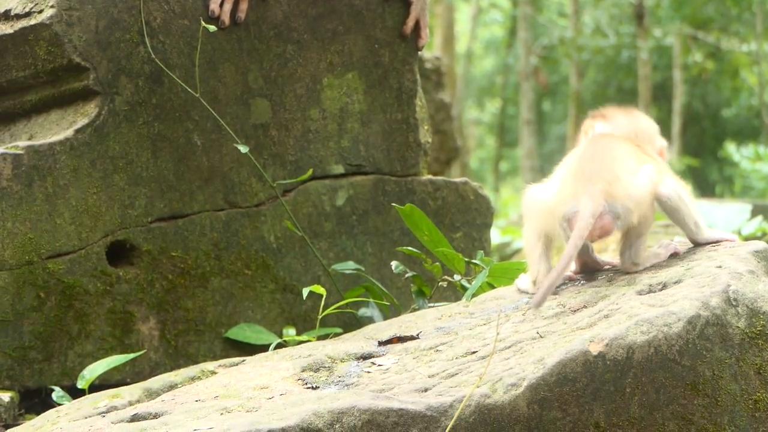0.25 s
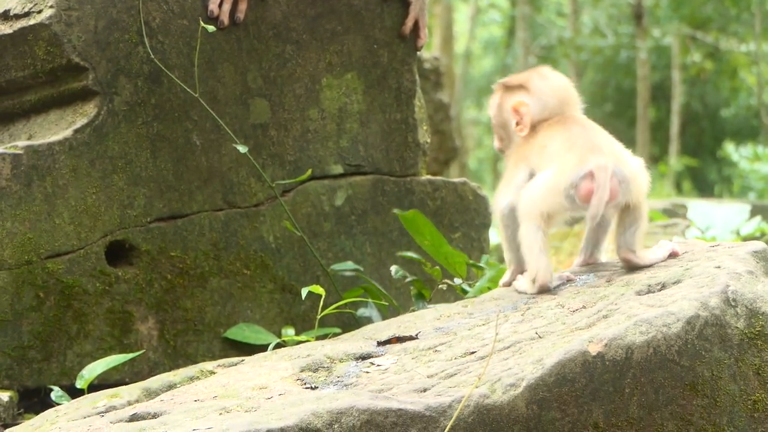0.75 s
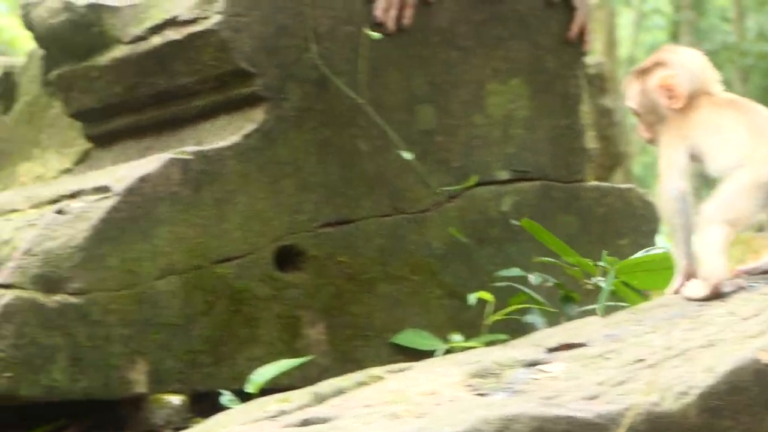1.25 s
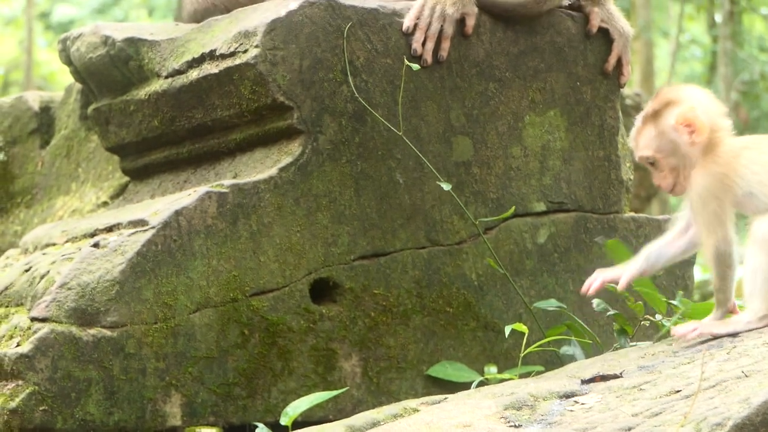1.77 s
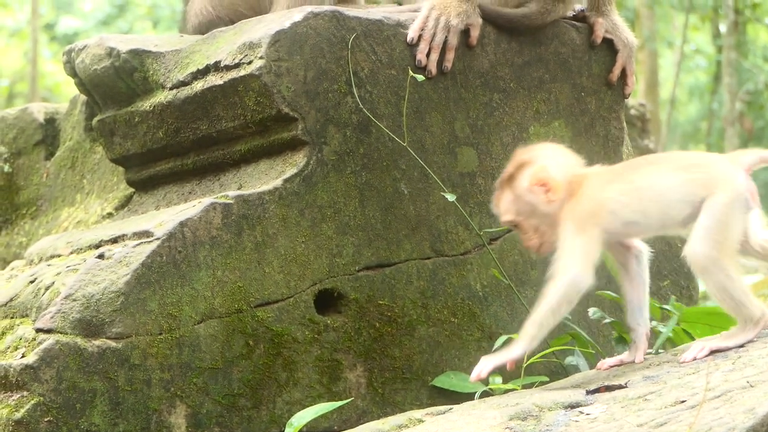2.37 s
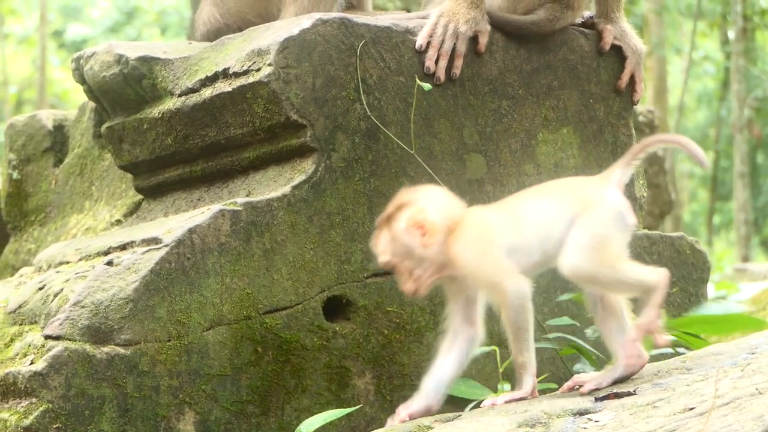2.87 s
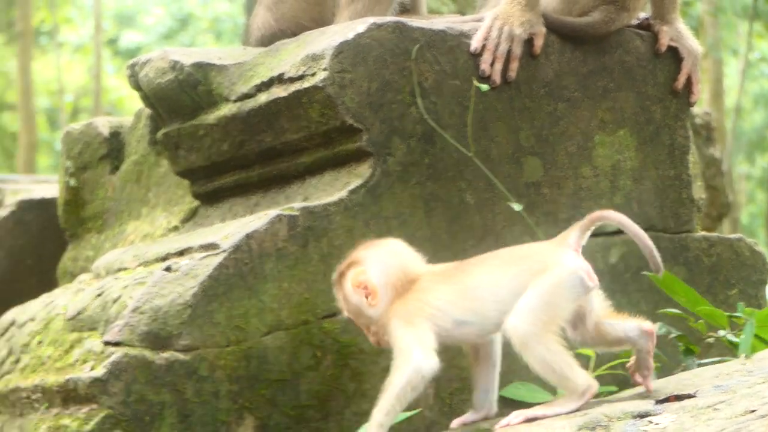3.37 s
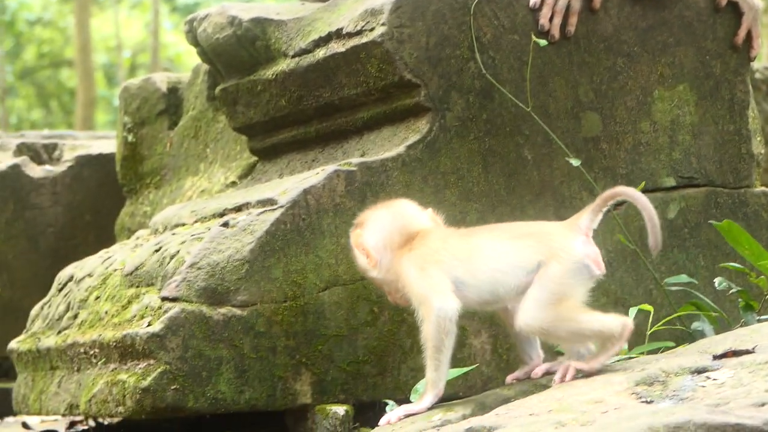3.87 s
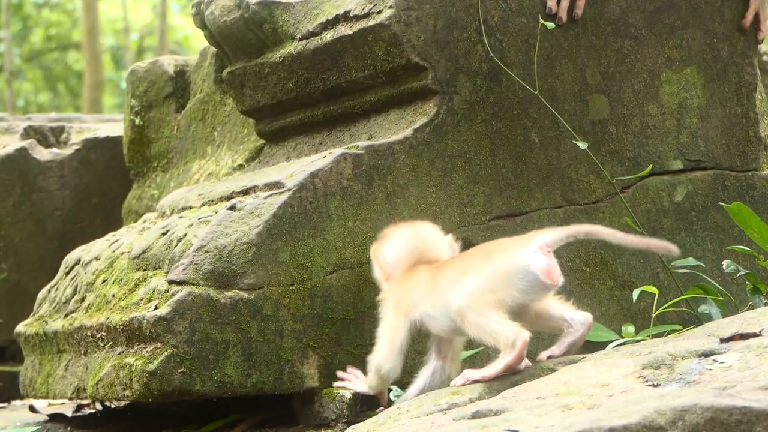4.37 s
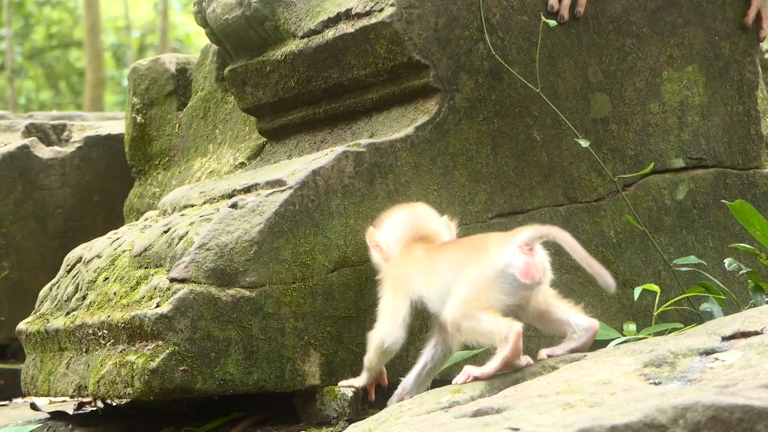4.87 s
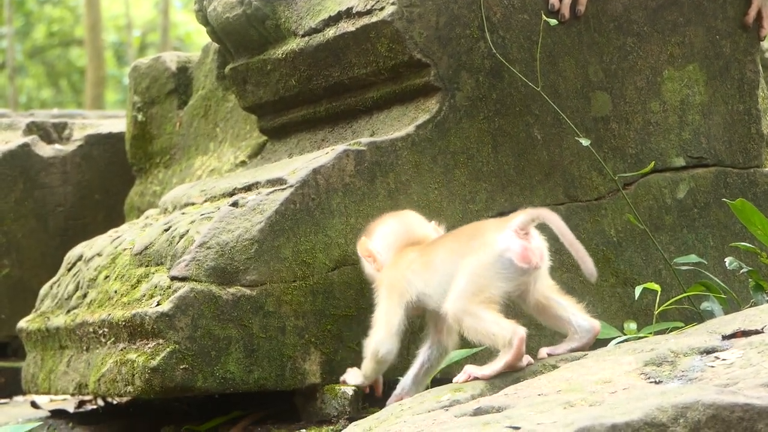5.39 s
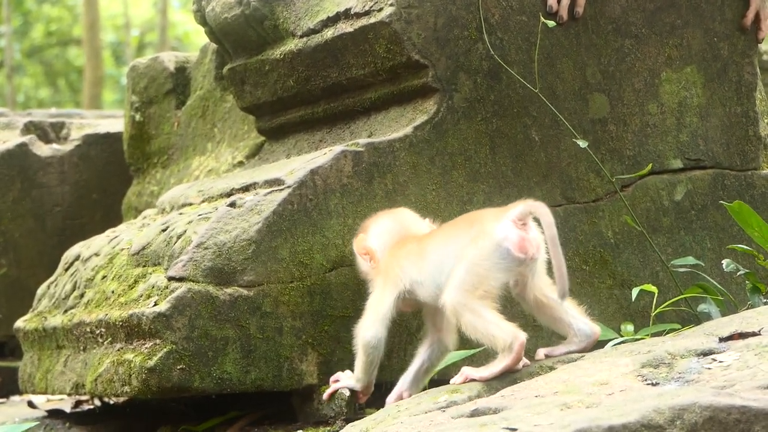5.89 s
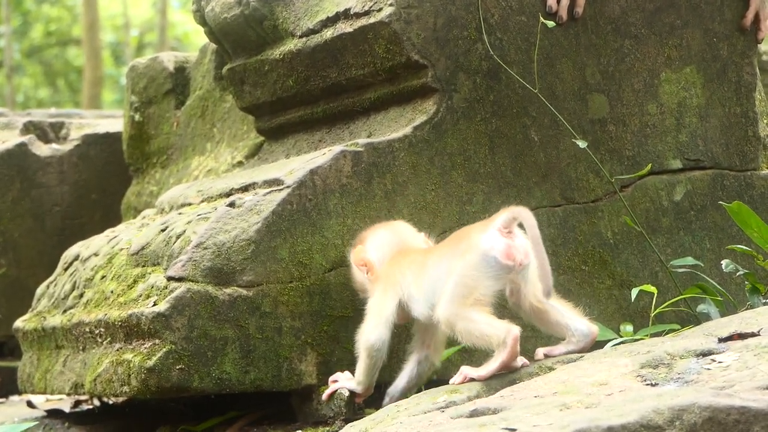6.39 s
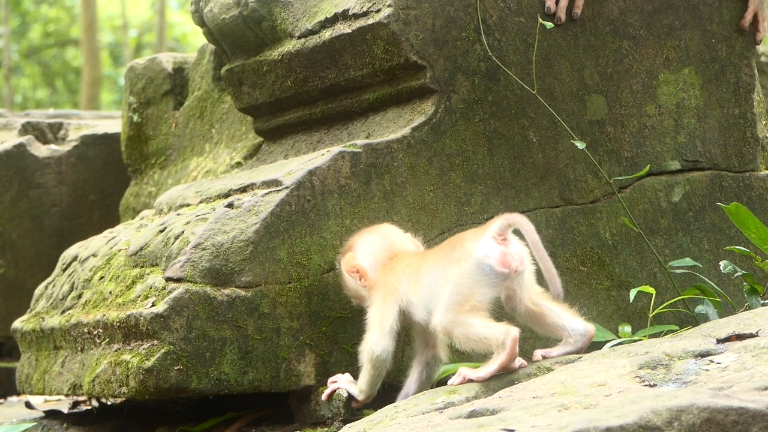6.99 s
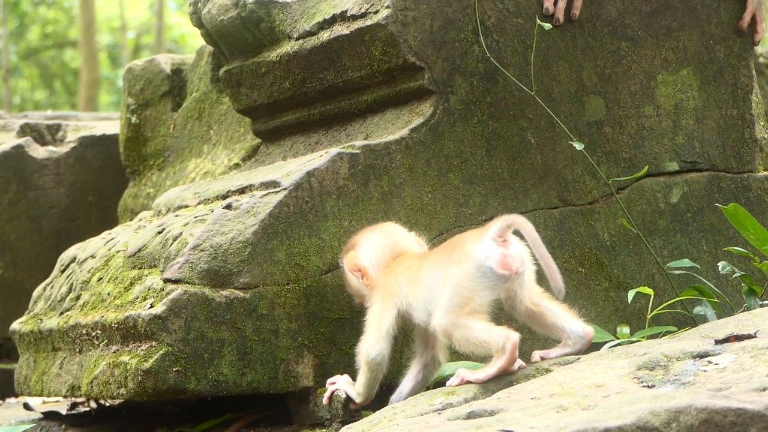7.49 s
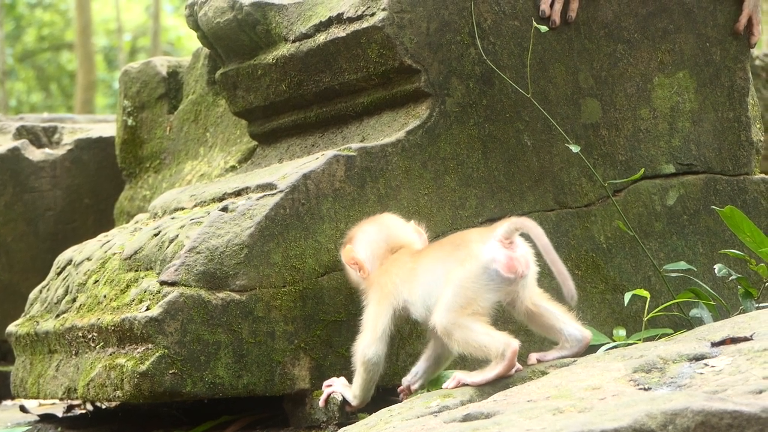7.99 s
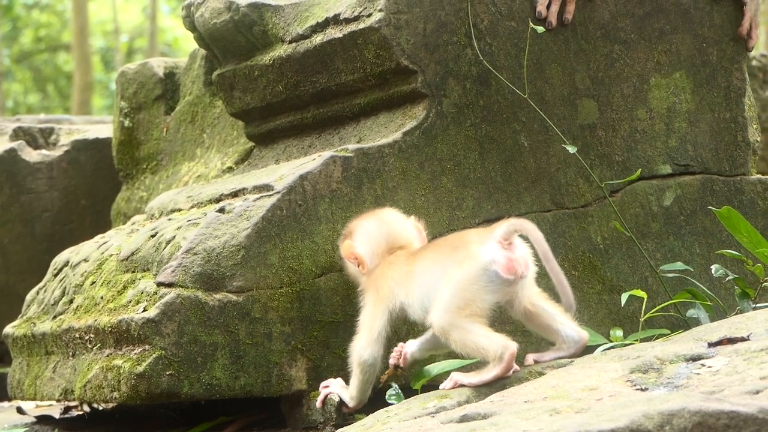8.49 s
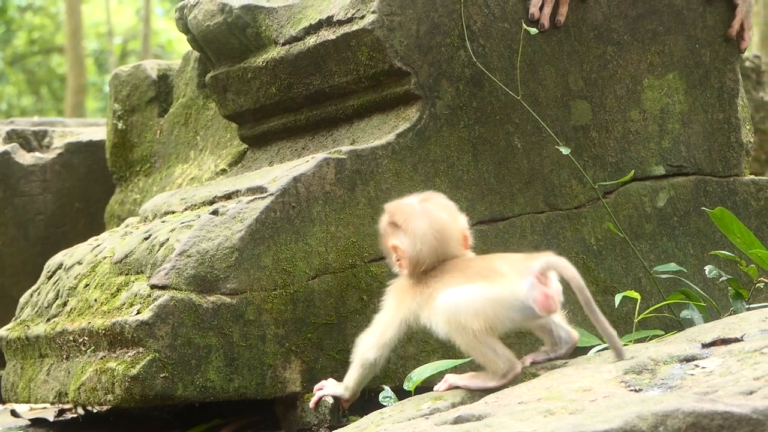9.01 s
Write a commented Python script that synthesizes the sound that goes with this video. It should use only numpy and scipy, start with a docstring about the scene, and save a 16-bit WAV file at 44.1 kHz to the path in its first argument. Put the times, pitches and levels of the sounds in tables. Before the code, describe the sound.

A dense, shrill cricket drone and airy katydid hiss run throughout a tropical forest over a faint low rumble. A far motor hum fades early. A distant bird, slightly left, repeats echoing falling chirps in three runs, with tiny canopy chips and a soft frog trill. Close to the microphone, a small monkey's feet tick grit, a stone knocks and clacks past the middle, and leaves brush late.

```python
"""Crickets merge into one shrill drone of sagging tones over fluttering katydid noise and a low far rumble.
A distant bird repeats a falling chirp, a sine that slides and breaks to a low note; smaller birds chip in the
canopy, a frog trills by pulsed resonance, and the low orders of a far motor fade away in a tropical forest by day.
A young monkey clambers over rock: grit ticks as noise bursts, a loose stone tips and clacks as struck modes,
and leaves brush past as grainy noise."""
import sys
import numpy as np
from scipy import signal
from scipy.fft import rfft, irfft, next_fast_len
from scipy.io import wavfile

SR = 44100
rng = np.random.default_rng(int(sys.argv[2]) if len(sys.argv) > 2 else 0)


def transcribe(u):
    """Save the signal u as a 16-bit wav file named by the first command-line argument.

    u: samples, shape (n,) or (channels, n), limited to [-1, 1]; the rate is SR.
    q: integer samples, one column per channel.
    """
    v = np.clip(np.atleast_2d(u).T, -1, 1)
    q = np.round(v * 32767).astype(np.int16)
    wavfile.write(sys.argv[1], SR, q)


N = 407925
TIME = np.arange(N) / SR


def from_db(db):
    """Decibels are a logarithm of amplitude: 20 dB is a factor of ten."""
    return 10 ** (np.asarray(db) / 20)


def rms_one(x):
    """Normalization to unit root mean square, the measure of signal power."""
    return x / np.sqrt(np.mean(x ** 2) + 1e-20)


def in_time(rows, t=TIME):
    """Linear interpolation in time of each column after the first."""
    seconds, *columns = np.transpose(rows)
    return [np.interp(t, seconds, column) for column in columns]


def at_hz(points, hz):
    """Interpolation on a logarithmic frequency axis, where equal ratios are equal steps."""
    point_hz, values = np.array(points)[:, 0], np.array(points)[:, 1]
    return np.interp(np.log(hz + 1e-9), np.log(point_hz), values)


def pan(left_db):
    """Interaural level difference: half the decibels are added left and half taken right."""
    return from_db(np.array([[.5], [-.5]]) * left_db)


def drift(rate):
    """Band-limited random modulation: normal deviates, rate per second, joined by lines; rms 1."""
    knots = rng.standard_normal(N // 20)
    return rms_one(np.interp(TIME * rate, np.arange(len(knots)), knots))


def ring(clicks, hz, t60):
    """Impulse response of a damped resonator: a unit click rings a sine that loses 60 dB in t60 seconds."""
    radius = from_db(-60 / (t60 * SR))
    angle = 2 * np.pi * hz / SR
    feedback = [1, -2 * radius * np.cos(angle), radius * radius]
    return signal.lfilter([0, np.sin(angle)], feedback, clicks + 1e-18)


def diffuse_noise(spectrum):
    """Diffuse field: spectrally shaped noise whose ears correlate by frequency; rms 1."""
    # Each row: frequency in Hz, left-right correlation.
    likeness = [(60, 0.8), (130, 0.82), (300, 0.52), (640, 0.52), (1400, 0.33), (3000, 0.66), (5000, 0.81),
                (9000, 0.86), (14000, 0.36)]
    size = next_fast_len(N)
    hz = np.fft.rfftfreq(size, 1 / SR) + 1e-3
    # steep fall beyond both ends of the spectrum
    ends = np.minimum(1, np.minimum(hz / spectrum[0][0], spectrum[-1][0] / hz)) ** 4
    alike = np.clip(at_hz(likeness, hz), 0, 1)
    mid, side = rfft(rng.standard_normal((2, size)))
    both = np.sqrt(1 + alike) * mid + np.sqrt(1 - alike) * side * [[1], [-1]]
    shaped = both * from_db(at_hz(spectrum, hz)) * ends
    return rms_one(irfft(shaped, size)[:, :N])


def forest(x, wet_db, width, t60=0.46):
    """Multiple scattering from trunks: direct sound plus an exponentially dying tail."""
    t = TIME[:SR]
    decay = from_db(-60 * t / t60) * (t > .004)  # silent for the first 4 ms
    mid, side = rng.standard_normal((2, SR)) * decay
    # width scales the part that differs between the ears
    echoes = (mid + width * side * [[1], [-1]]) / np.sqrt(np.sum(mid ** 2))
    return x + from_db(wet_db) * signal.fftconvolve(np.atleast_2d(x), echoes, axes=1)[:, :N]


def background(rumble_db, wash_db, shimmer_db):
    """Superposed diffuse noise: far rumble, the wash of foliage and the shimmer of remote insects."""
    # Spectra of rumble, foliage and remote insects. Each row: frequency in Hz, relative density in dB per Hz.
    rumble_spectrum = [(25, -25), (48, -16), (62, -9), (78, -4.5), (120, -0.5), (165, -4), (200, -8),
                       (350, -7), (400, -16), (480, -24), (600, -20)]
    wash_spectrum = [(300, -14.5), (480, 0.5), (620, 2.5), (850, 0), (1100, 2), (1300, -2), (1800, -1.5),
                     (2500, -4), (3600, -29.5)]
    shimmer_spectrum = [(2600, -0.5), (3300, -1), (3750, -5.5), (4400, 2.5), (5000, 4), (5600, 0),
                        (6500, -2.5), (7100, -1), (7800, -47.5)]
    # Courses of far rumble, breeze in foliage and remote insects.
    # Each row: time in seconds, level in dB before the gain of that layer.
    rumble_course = [(0, -56), (1.3, -55), (2.5, -59), (3.1, -57), (4.5, -57), (9.25, -57)]
    wash_course = [(0.0, -62), (1.08, -59.5), (1.54, -60.5), (4.04, -60), (4.51, -62.5), (9.25, -58.5)]
    shimmer_course = [(0.0, -59.5), (3.63, -56.5), (4.69, -59.5), (7.2, -61), (9.25, -58)]
    rumble = from_db(in_time(rumble_course)[0] + rumble_db) * diffuse_noise(rumble_spectrum)
    wash = from_db(in_time(wash_course)[0] + wash_db) * diffuse_noise(wash_spectrum)
    shimmer = from_db(in_time(shimmer_course)[0] + shimmer_db) * diffuse_noise(shimmer_spectrum)
    return rumble * pan(-0.3) + wash + shimmer


def low_hum(unsteady):
    """Gaussian amplitude envelope: a low hum swells once out of the rumble."""
    # One swell: peak in seconds, half length in seconds, pitch in Hz, peak level in dB.
    swell = (3.86, 0.2, 120.5, -52)
    peak_s, half_length_s, hz, db = swell
    phase = 2 * np.pi * np.cumsum(hz * (1 + unsteady * drift(30))) / SR
    return from_db(db) * np.exp(-((TIME - peak_s) / half_length_s) ** 2) * np.sin(phase)


def motor(unsteady):
    """Harmonic series: only the lowest orders of a far engine carry through the forest."""
    # Each row: time in seconds, mean firing rate in Hz, level in dB.
    firing = [(0, 156.7, -55), (.25, 154.3, -62.5), (.6, 165.1, -53), (1.0, 173.1, -55.5),
              (1.35, 165.2, -55), (1.7, 158.6, -71), (3, 150, -100)]
    # Each row: multiple of the firing rate, relative level in dB.
    orders = [(1, 0), (2, -6.5), (3, -16), (4, -17)]
    hz, db = in_time(firing)
    phase = 2 * np.pi * np.cumsum(hz * (1 + unsteady * drift(25.56))) / SR
    hum = sum(from_db(order_db) * np.sin(k * phase) for k, order_db in orders)
    return forest(from_db(db) * hum, wet_db=-5.5, width=0.34)


def katydids(hiss_db, flutter_db, band_db):
    """Filtered noise: a broad fluttering hiss of uneven density, with a few narrow noise bands added."""
    # Each row: frequency in Hz, relative hiss density in dB per Hz.
    hiss_spectrum = [(8200, -84), (8700, 6.5), (9200, 1.5), (10200, 0.5), (11000, 3.5), (12200, 5),
                     (13200, 0.5), (14300, -7), (15200, -29)]
    # Each row: band center in Hz, width in Hz, level in dB before the band gain.
    narrow_bands = [(5920, 120, -68), (8890, 19, -72.5), (9400, 70, -71), (9980, 46, -69), (10100, 90, -68),
                    (10420, 170, -69), (11950, 30, -72), (12300, 41, -74)]
    uneven = rms_one(forest(diffuse_noise(hiss_spectrum), wet_db=-13, width=0.2, t60=0.055))
    hiss = from_db(hiss_db + flutter_db * drift(77)) * uneven
    for hz, width_hz, db in narrow_bands:
        edges_hz = [hz - width_hz / 2, hz + width_hz / 2]
        band = signal.butter(2, edges_hz, "band", fs=SR, output="sos")
        mid, side = signal.sosfilt(band, rng.standard_normal((2, N)))
        hiss = hiss + from_db(db + band_db) * rms_one(mid + 0.18 * side * [[1], [-1]])
    return hiss * pan(-1.9)


def crickets(singers, sag_hz, shift_hz=0):
    """Stridulation: each wing stroke draws a file over a scraper, a short tone that sags in pitch."""
    out = 0
    for hz, strokes_per_s, db, wander_hz in singers:
        strokes = np.cumsum(strokes_per_s * (1 + 0.003 * drift(2.12))) / SR
        stroke = (strokes + rng.random()) % 1  # progress through one stroke
        pitch = hz + shift_hz + wander_hz * drift(45) + sag_hz * (.5 - stroke)
        tone = np.sin(np.pi * stroke) * np.sin(2 * np.pi * np.cumsum(pitch) / SR)
        out = out + from_db(db) * rms_one(forest(tone, wet_db=-1, width=0.19, t60=0.65))
    return out


def steady_crickets():
    """Superposition of near pitches: the constant chorus swells and ebbs by chance."""
    # Each row: pitch in Hz, wing strokes per second, relative level in dB, pitch wander in Hz.
    singers = [(7218, 24.7, -52.5, 11.15), (7253, 12.3, -51, 22.25), (7357, 48.9, -48.5, 30),
               (7413, 12.3, -53.5, 18), (7422, 36.9, -48.5, 12.14)]
    # Each row: time in seconds, chorus level in dB before the throb and gain.
    course = [(0, -44), (2.0, -43.5), (3.5, -44.5), (6.6, -47.5), (9.25, -45.5)]
    drone_db = in_time(course)[0] + 0.42 * drift(12)  # throb in dB; its knots per second
    return from_db(drone_db + 0.5) * rms_one(crickets(singers, sag_hz=38.4))


def late_crickets():
    """Frequency modulation by a slow glide: higher crickets join in and climb in pitch."""
    # Each row: pitch before the shift in Hz, wing strokes per second, level in dB before the entry course,
    # pitch wander in Hz.
    singers = [(7450, 24.7, -51, 9), (7600, 23, -55.5, 14), (7540, 32, -62, 26)]
    # Each row: time in seconds, gain in dB, pitch shift in Hz.
    entry = [(0, -50, -150), (3.6, 0, -130), (4.6, -2, -84.5), (5.2, 1, -34), (5.8, 0, 14.5), (7.3, -2, -5),
             (8.35, -3.5, 43), (9.25, -6, 0)]
    late_db, late_shift_hz = in_time(entry)
    return from_db(late_db) * crickets(singers, sag_hz=50, shift_hz=late_shift_hz)


def far_birds():
    """Pure tones under a raised-cosine envelope: single soft whistles that swell and fade."""
    # Each row: start in seconds, length in seconds, start pitch in Hz, end pitch in Hz, direct peak level in dB.
    calls = [(0.921, 0.16, 2146, 2040, -66.5), (1.097, 0.073, 602, 587, -60), (1.13, 0.035, 890, 830, -62),
             (1.22, 0.045, 1310, 1320, -61), (2.096, 0.13, 2800, 2770, -68), (3.11, 0.09, 1178, 1170, -58)]
    out = np.zeros(N + SR)
    for s, length, start_hz, end_hz, db in calls:
        hz = np.linspace(start_hz, end_hz, int(length * SR))
        whistle = np.hanning(len(hz)) * np.sin(2 * np.pi * np.cumsum(hz) / SR)
        out[int(s * SR):][:len(hz)] += from_db(db) * whistle
    return forest(out[:N], wet_db=5.0, width=0.49)


def canopy(slide, count=300):
    """Downward frequency sweeps: a few near chips, and many faint ones at random."""
    # Each row: start in seconds, direct level in dB, middle pitch in Hz.
    near = [(.2, -54, 4930), (.47, -54, 4950), (2.975, -54, 5100), (3.28, -52, 5100), (3.68, -56, 4800),
            (7.33, -56, 4900)]
    # Each row: time in seconds, level in dB of the loudest flock chips.
    flock = [(0, -59.5), (3.7, -64), (4.5, -60.5), (9.25, -55.5)]
    lowest_hz, range_hz, spread_db = 4390, 908, 5.5
    when, far, high = rng.random((count, 3)).T
    times = when * N / SR
    faint_db = in_time(flock, times)[0] - spread_db * far
    faint = zip(times, faint_db, lowest_hz + range_hz * high)
    out, course = np.zeros(N + SR), np.linspace(0, 1, SR // 56)
    for s, db, hz in [*near, *faint]:
        pitch = hz * (1 + slide * (.5 - course))
        chip = np.sin(np.pi * course) * np.sin(2 * np.pi * np.cumsum(pitch) / SR)
        out[int(s * SR):][:len(course)] += from_db(db) * chip
    return forest(out[:N], wet_db=2.5, width=0.43, t60=0.18)


def frog(hz, pulses_per_s, t60, unsteady):
    """Pulsed excitation of a resonator: nearly regular pulses ring the vocal sac, in bouts."""
    # Each row: start in seconds, end in seconds, direct level in dB.
    trills = [(0.19, .95, -67.5), (1.72, 2.324, -67), (2.986, 4.41, -67.5), (6.842, 7.81, -65.5),
              (8.6, 9.2, -66.5)]
    pulse_count = np.floor(TIME * pulses_per_s + unsteady * drift(40))
    pulses = np.diff(pulse_count, prepend=0).clip(0)
    bouts = 0
    for start, end, db in trills:
        bouts = bouts + from_db(db) * np.clip(np.minimum(TIME - start, end - TIME) / 0.011, 0, 1)
    voice = rms_one(ring(ring(pulses, hz, t60), hz, t60))  # ringing twice rounds the onset
    return forest(bouts * voice, wet_db=-2, width=0.55, t60=.3)


def bird(waver, voice_db):
    """Frequency glide with reverberation: each chirp slides down, breaks to a held note and is smeared by trees."""
    # Three even runs. Each row: start in seconds, slide level in dB, end note level in dB,
    # both before the voice gain and the slide's fade.
    chirps = [(1.760, -53, -62), (2.04, -56, -60.5), (2.320, -54, -59.5), (2.594, -53.5, -58),
              (2.876, -54.5, -57), (3.171, -53, -73), (4.424, -56.5, -61.5), (4.705, -53, -64),
              (4.984, -51.5, -59), (5.262, -51, -60), (5.540, -54, -57.5), (5.816, -54, -61.5),
              (6.090, -53.5, -61), (7.404, -69, -61.5), (7.686, -56, -59), (7.964, -53, -61),
              (8.243, -54.5, -57.5), (8.520, -53, -59.5), (8.794, -54, -61), (9.082, -55.5, -62.5)]
    top_hz, break_hz, end_hz = 2860, 1988, 1649
    slide_s, attack_s, hold_s, release_s = .042, 0.005, 0.032, 0.015
    fade_db, quaver_hz, quavers_per_s = 5, 95.4, 331
    t, out = TIME[:SR // 8], np.zeros(N + SR)
    slid = np.minimum(t / slide_s, 1) ** 1.45  # the slide falls ever faster
    broken = np.clip((t - slide_s) / attack_s, 0, 1)
    pitch = top_hz + (break_hz - top_hz) * slid + (end_hz - break_hz) * broken
    release = 1 - (t - slide_s - hold_s) / release_s
    envelope = np.clip(np.minimum(t / attack_s, release), 0, 1)
    for s, slide_db, end_note_db in chirps:
        db = (1 - broken) * (slide_db - fade_db * slid) + broken * end_note_db
        # the slide is rough, the end note pure
        quaver = np.interp(t * quavers_per_s, np.arange(len(t)), rng.standard_normal(len(t)))
        hz = pitch * (1 + 0.0032 * rng.standard_normal()) + quaver_hz * (1 - broken) * quaver
        chirp = envelope * np.sin(2 * np.pi * np.cumsum(hz) / SR)
        out[int(s * SR):][:len(t)] += from_db(db + voice_db) * chirp
    voice = out[:N] * (1 + waver * drift(500))
    return forest(voice, wet_db=2.0, width=0.4, t60=1.65) * pan(6.5)


def leaves(grain_db):
    """Friction noise: leaves slide over fur in clumps of fine grains; each brush swells and dies away."""
    # Each row: frequency in Hz, relative density in dB per Hz.
    leaf_spectrum = [(300, -18), (900, -2), (1800, 0), (3500, 0.5), (5000, 2), (7000, 0.5), (10000, -2.5),
                     (14000, -25)]
    # Each row: peak time in seconds, level in dB, swell and fade time constants in seconds.
    brushes = [(8.302, -43, 0.042, 0.022), (8.332, -44, 0.011, 0.026), (8.385, -44.5, 0.013, 0.028),
               (9.25, -45.5, 0.043, .1)]
    grains = rms_one(from_db(grain_db * (drift(1100) + drift(90))))
    pressure = 0
    for s, db, swell_s, fade_s in brushes:
        pressure = pressure + from_db(db) * np.exp(-np.maximum((s - TIME) / swell_s, (TIME - s) / fade_s))
    return pressure * grains * diffuse_noise(leaf_spectrum)


def footfalls(snap_s, settle_s, settle_db, grit_db):
    """Impulsive noise with two decay rates: grit snaps under a hand or foot, then settles faintly."""
    # Each row: start in seconds, then body, crisp and fine sand levels in dB before the grit gain.
    ticks = [(0.4648, -49.5, -58, -62), (2.067, -47, -52, -47), (2.4295, -45, -38, -40),
             (2.7425, -37.5, -37.5, -46), (3.2973, -42, -55, -64), (4.1533, -42, -37.5, -41)]
    # Bands of body, crisp and fine sand. Each row: lower edge in Hz, upper edge in Hz.
    bands_hz = [(950, 3200), (4000, 5600), (8500, 11200)]
    t, out = TIME[:SR // 10], np.zeros(N + SR)
    envelope = np.exp(-t / snap_s) + from_db(settle_db) * np.exp(-t / settle_s)
    for s, *levels_db in ticks:
        crunch = rng.laplace(size=len(t)) * envelope
        for band_hz, db in zip(bands_hz, levels_db):
            grit = signal.sosfilt(signal.butter(2, band_hz, "band", fs=SR, output="sos"), crunch)
            out[int(s * SR):][:len(t)] += from_db(db + grit_db) * grit
    return out[:N]


def stone(contacts, modes):
    """Modal synthesis: each contact is a click, duller when soft, that rings the stone's short modes."""
    force = np.zeros(N)
    for s, db, bright_hz in contacts:
        soft = signal.butter(2, min(bright_hz, SR / 3), fs=SR, output="sos")
        click = signal.sosfilt(soft, signal.unit_impulse(SR // 50))
        force[round(s * SR):][:SR // 50] += from_db(db) * click
    # neighboring modes have opposite signs
    return sum((-1) ** k * from_db(db) * ring(force, hz, t60) for k, (hz, db, t60) in enumerate(modes))


def loose_stone():
    """Impact excitation of two mode sets: the stone tips with dull knocks, then clacks against the rock."""
    # Contacts of knocks and clacks. Each row: time in seconds, level in dB, contact brightness in Hz.
    knocks = [(5.5830, -41, 3500), (5.5851, -25, 1800), (5.5985, -26, 453)]
    clacks = [(5.6664, -29, 2600), (5.6737, -18.5, 7000), (5.6763, -25, 2980), (5.6795, -36, 5000)]
    # Their modes. Each row: frequency in Hz, relative level in dB, 60 dB decay time in seconds.
    knock_modes = [(259.5, -10.5, 0.22), (364, -11.5, 0.11), (930, 0, 0.015), (1090, -2.5, 0.021),
                   (1640, -11, 0.043), (3000, -5, 0.022)]
    clack_modes = [(335, -9.5, 0.03), (747, -0.5, 0.012), (1060, -8, 0.0075), (1415, -2.5, 0.013),
                   (1667, -0.5, 0.026), (2620, -2, 0.0026), (4240, -4, 0.0088), (5300, 1, 0.0035),
                   (6500, -3, 0.0041)]
    return stone(knocks, knock_modes) + stone(clacks, clack_modes)


def scene():
    """Linear superposition of the forest and the monkey's movements."""
    air = background(rumble_db=3.0, wash_db=2.5, shimmer_db=0.97)
    drone = (steady_crickets() + late_crickets()) * pan(-.2)
    insects = drone + katydids(hiss_db=-55, flutter_db=0.35, band_db=0.0)
    hums = motor(unsteady=0.0082) + low_hum(unsteady=.04)
    birds = bird(waver=0.46, voice_db=2.5) + far_birds() + canopy(slide=0.159)
    trill = frog(hz=1462, pulses_per_s=49.15, t60=0.012, unsteady=0.0804)
    steps = loose_stone() + footfalls(snap_s=0.004, settle_s=0.028, settle_db=-8, grit_db=0.5)
    monkey = forest(steps, wet_db=-11.5, width=1.0, t60=0.051) + leaves(grain_db=2.5)
    return air + insects + hums + birds + trill + monkey


def record(dry):
    """Low-pass filtering: an elliptic filter cuts the top steeply above 15050 Hz."""
    return signal.sosfilt(signal.ellip(10, .1, 80, 15050, fs=SR, output="sos"), dry)


dry = scene()
out = record(dry)
transcribe(out)
```